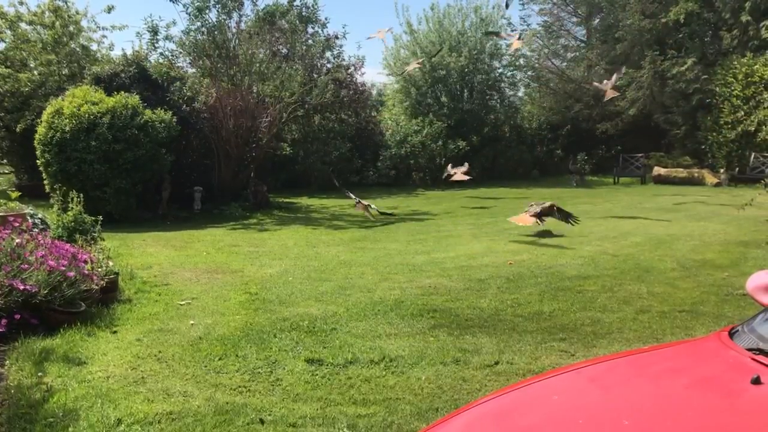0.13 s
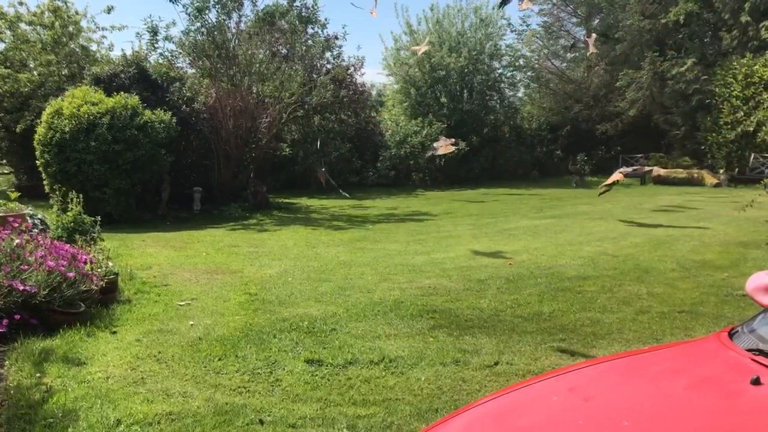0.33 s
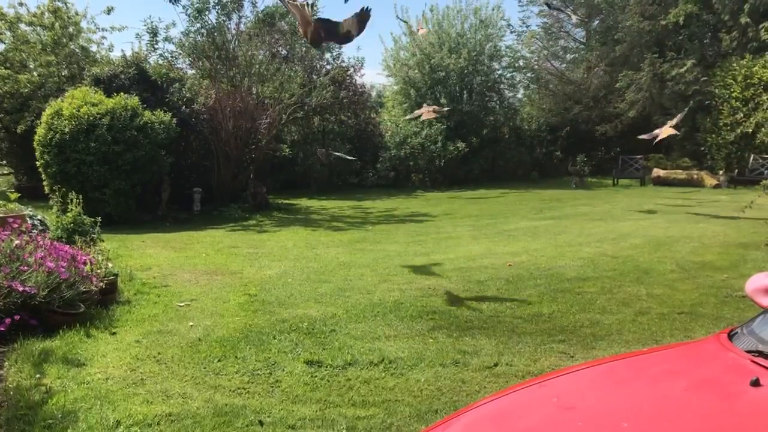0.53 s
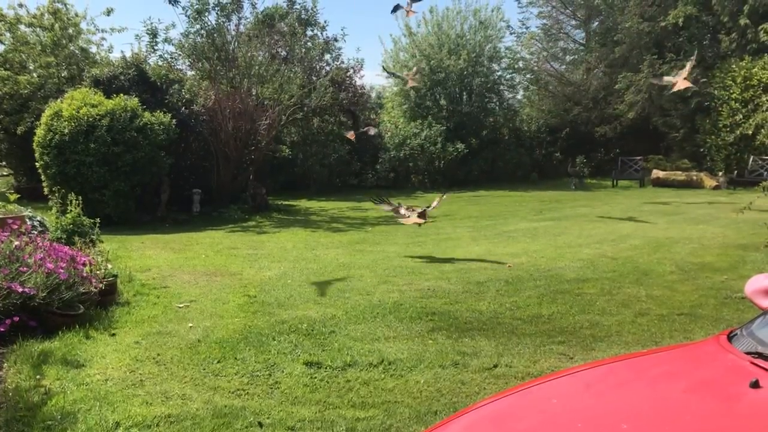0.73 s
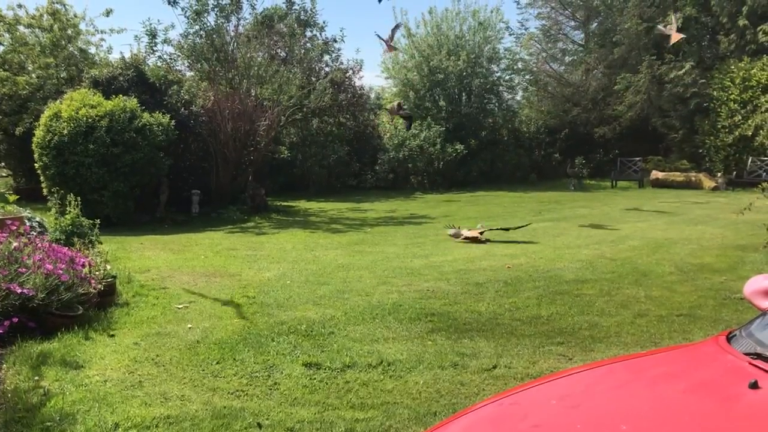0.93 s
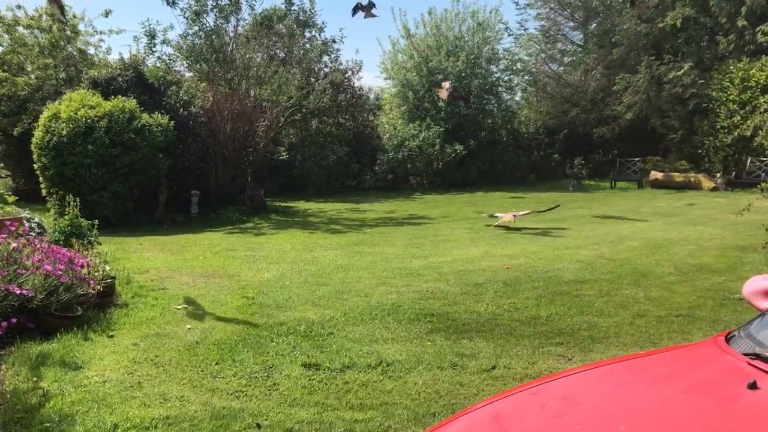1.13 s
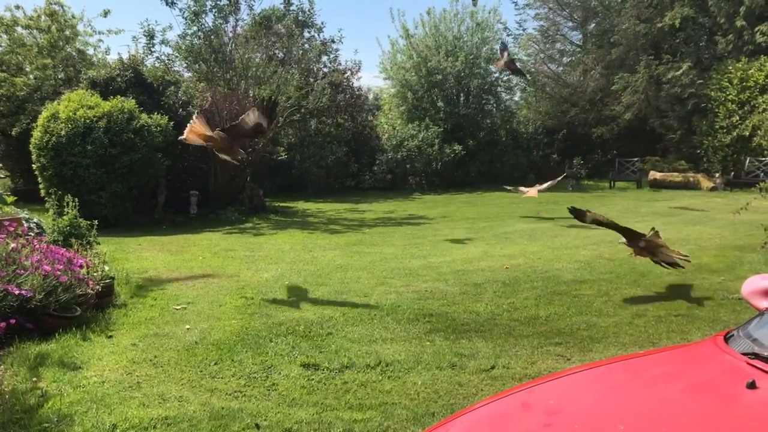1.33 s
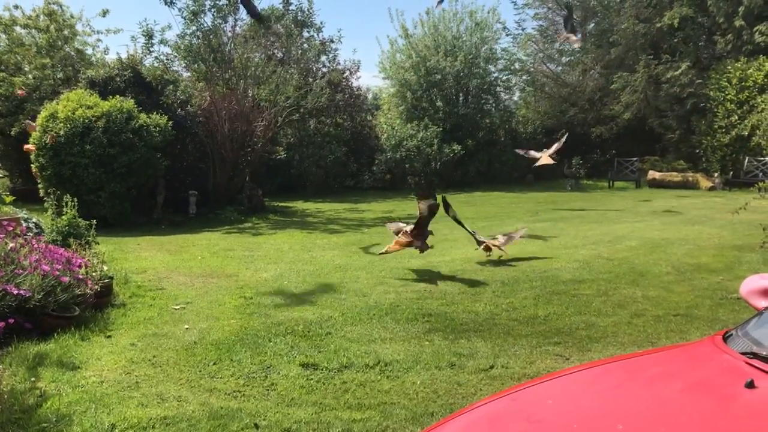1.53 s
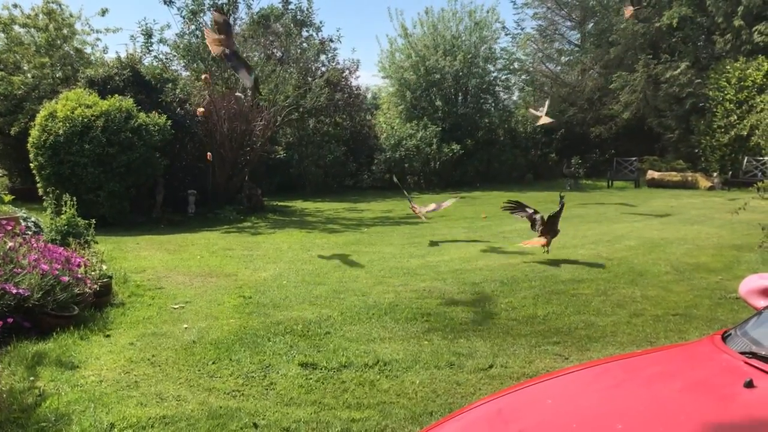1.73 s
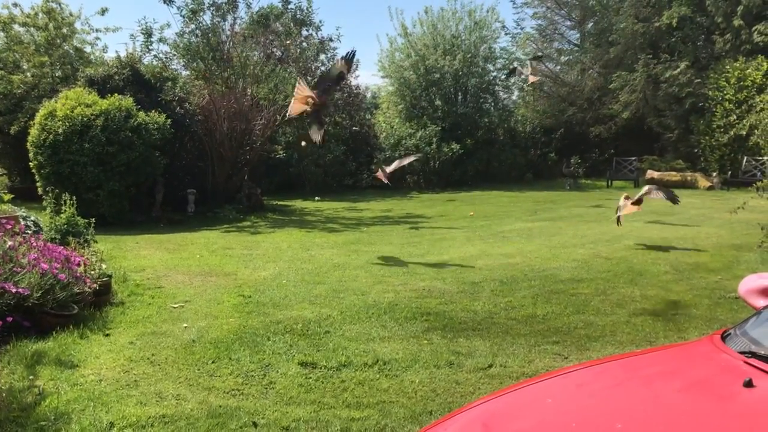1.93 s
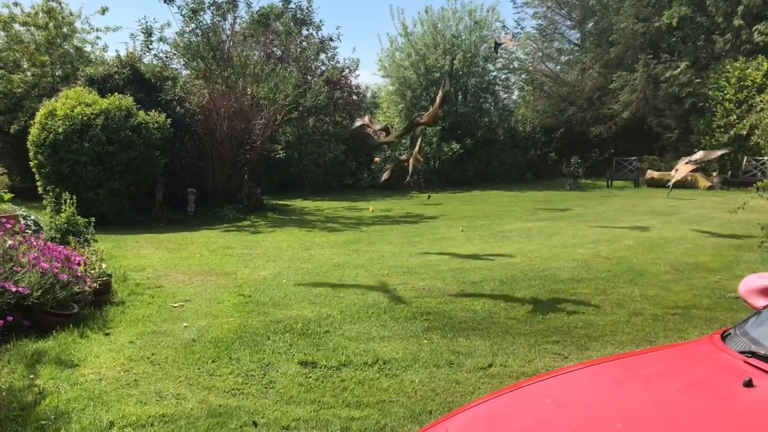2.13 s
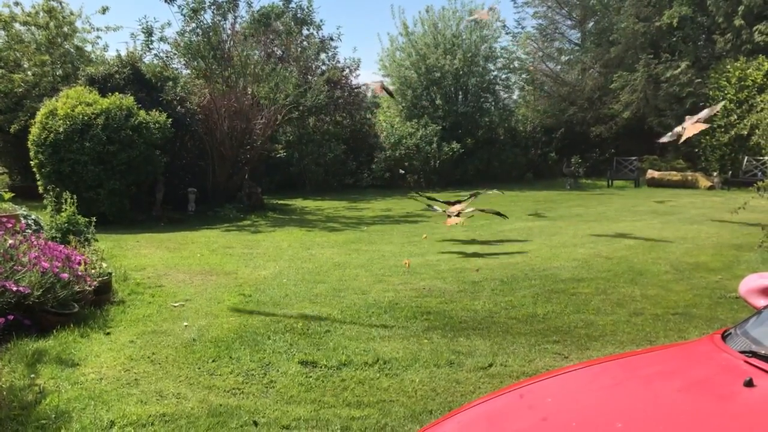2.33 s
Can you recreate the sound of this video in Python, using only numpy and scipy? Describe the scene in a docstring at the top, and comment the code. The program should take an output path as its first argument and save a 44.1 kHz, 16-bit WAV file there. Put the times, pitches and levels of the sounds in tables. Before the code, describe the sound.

Red kites whistle over a quiet garden. From 0.2 s a call rises near 2 kHz, leaps above 3 kHz, wavers hoarsely, cracks higher and drops by 0.78 s; a second kite overlaps at 0.2-0.43 s. Softer mews near 2.2 kHz follow at 0.85, 1.24, 1.38-1.6 (longest), 1.7 and 1.95 s. Faint wingbeats, swishes, a tiny snap at 1.58 s, breeze, low rumble and short tree echoes.

```python
"""A garden lawn with trees around it, under a light breeze and a low outdoor rumble. Wings beat in bursts of
coloured noise, with feather swishes and snaps and low puffs from the nearest wings. One red kite gives a long
whistle that breaks up into a high register and falls back, a second joins it, and five shorter mews follow:
unsteady tones with overtones, hoarsened by a fast phase flutter. The ground answers the calls with a few single
echoes, and the trees with a soft tail."""
import sys
import numpy as np
from scipy import signal
from scipy.fft import rfft, irfft, next_fast_len
from scipy.io import wavfile
from scipy.ndimage import map_coordinates

SR = 44100
rng = np.random.default_rng(int(sys.argv[2]) if len(sys.argv) > 2 else 0)


def file_out(sig):
    """Save sig as 16-bit WAV at sys.argv[1]."""
    # one column per channel
    cols = np.atleast_2d(sig).T
    # limit, then scale
    lim = np.clip(cols, -1, 1)
    pcm = np.round(lim * 32767).astype(np.int16)
    wavfile.write(sys.argv[1], SR, pcm)


N = 105840  # samples, 2.4 s

# Light wind in the leaves: time_s, level_db (before BREEZE_DB is added)
BREEZE_LEVEL = [(0.0, -60.5), (0.29, -63), (0.43, -63.5), (0.57, -64), (0.8, -63.5), (1.1, -64.5),
                (1.31, -60.5), (1.73, -64), (1.94, -59.5), (2.14, -64.5), (2.4, -63.5)]
BREEZE_DB = 3
# Colour of the wind in the leaves: frequency_hz, relative_level_db (per Hz)
LEAF_COLOUR = [(65, 1), (110, -8), (257, -9), (1430, -13.5), (2310, -21), (2560, -17), (3950, -17),
               (4960, -23), (9430, -24.5), (15500, -43)]
# Low outdoor rumble, its colour: frequency_hz, relative_level_db (per Hz)
RUMBLE_COLOUR = [(15, -66), (25, -19), (33, -14), (45, -10.5), (55, 0), (68, -4), (82, -7.5), (100, -7.5),
                 (125, -15), (220, -21), (500, -41)]
# Drift of the rumble: time_s, level_db
RUMBLE_LEVEL = [(0, -62), (.06, -59), (.38, -56), (.7, -61.5), (.85, -60.5), (1.04, -61.5), (1.3, -58.5),
                (1.39, -58.5), (1.43, -64), (1.52, -57.5), (2.0, -60), (2.14, -64), (2.3, -56), (2.4, -62)]

# Faint, narrow hiss behind the mews: centre_s, length_s, level_db
HAZES = [(1.125, 0.027, -67), (1.265, .04, -62), (1.43, .03, -63), (1.53, 0.032, -63)]
# Colour of that hiss: frequency_hz, relative_level_db (per Hz)
HAZE_COLOUR = [(1500, -29), (2500, -12), (3050, 0), (3400, -4), (4200, -17), (6000, -39)]

# Wingbeats: centre_s, length_s, level_db
WINGBEATS = [(.32, 0.034, -60), (.39, 0.02, -55), (.49, 0.069, -57), (.697, .016, -54), (1.165, .01, -60),
             (1.705, 0.018, -57.5), (1.78, 0.051, -61.5), (1.96, 0.09, -57), (2.03, 0.018, -53.5),
             (2.15, 0.025, -55), (2.355, 0.026, -58.5)]
# Colour of a wingbeat: frequency_hz, relative_level_db (per Hz)
WING_COLOUR = [(40, -7), (120, -3), (350, 0), (700, -3.5), (1400, -7.5), (3500, -13.5), (8000, -20.5),
               (16000, -29)]
# Feather swishes and snaps: centre_s, length_s, level_db
SWISHES = [(.64, 0.064, -61), (.99, .03, -66), (1.088, 0.019, -58), (1.162, 0.015, -65),
           (1.5765, .0012, -47.5), (1.582, 0.015, -60), (1.607, 0.0098, -59.5), (1.835, 0.022, -62.5),
           (2.015, 0.047, -61), (2.12, 0.019, -64)]
# Colour of rushing feathers: frequency_hz, relative_level_db (per Hz)
FEATHER_COLOUR = [(300, 0), (1500, -1), (4000, 4.5), (9000, 1.5), (12000, -3), (16000, -4.5)]
# Low puffs of air from the nearest wings: centre_s, length_s, level_db
PUFFS = [(.21, 0.013, -61), (.975, 0.017, -63), (1.8, 0.051, -60.5), (1.985, 0.013, -54.5),
         (2.03, 0.023, -56), (2.14, 0.043, -64.5)]
# Colour of a puff: frequency_hz, relative_level_db (per Hz)
PUFF_COLOUR = [(40, -28), (90, -0.5), (150, 2), (240, -8), (370, -2), (600, -25.5), (2000, -57)]

# Single echoes off the ground: delay_s, level_db
ECHOES = [(.021, -10.5), (.033, -15.5), (.062, -32.5)]
# Diffuse tail from the trees: frequency_hz, decay_s (time to fall 60 dB)
TAIL_DECAY = [(300, 0.54), (2500, 0.53), (5000, 0.46), (12000, 0.28)]
TAIL_DB = -14.5  # energy of the whole tail against the sent call

# Calls, each traced as: time_s, pitch_hz, first_harmonic_db, second_harmonic_db, third_harmonic_db
# (levels before air loss and shimmer). First the long whistle, in five pieces:
LONG_START = [(.187, 1827, -54, -71, -71), (.2, 1983, -52.5, -49.5, -68), (.215, 2045, -57, -53, -74),
              (.23, 2130, -43, -63, -65), (.255, 2165, -57, -67, -63), (.275, 2130, -51, -56, -63),
              (.295, 2045, -49, -54.5, -77), (.325, 2170, -48, -68, -80)]
LONG_HIGH = [(.311, 3150, -47, -76, -84), (.33, 3125, -39.5, -58.5, -80), (.39, 3090, -40, -57.5, -71),
             (.42, 3140, -48, -70, -73), (.446, 3220, -53, -60, -74), (.457, 3255, -37, -61, -69),
             (.5, 3240, -44.5, -58, -67), (.54, 3248, -37.5, -62.5, -67), (.578, 3300, -45, -69, -69),
             (.586, 3340, -52, -72, -68), (.601, 3350, -52, -69, -71), (.608, 3330, -39.5, -63, -60),
             (.626, 3340, -46, -63, -64), (.632, 3290, -34, -58, -64), (.643, 3285, -34, -57, -59),
             (.66, 3335, -45.5, -69, -67), (.668, 3340, -36, -67, -60), (.678, 3335, -45.5, -65, -70),
             (.688, 3290, -37.5, -61, -70), (.699, 3320, -41.5, -62, -70), (.71, 3346, -35, -66, -72),
             (.722, 3350, -41, -72, -78)]
LONG_CRACK = [(.713, 3910, -42, -72, -85), (.724, 3990, -40.5, -61, -73), (.74, 3820, -43.5, -64, -78)]
LONG_DROP = [(.735, 3120, -57, -68, -62), (.749, 3115, -32.5, -51, -63), (.758, 3024, -40.5, -51, -62)]
LONG_END = [(.756, 2260, -55, -68, -72), (.768, 2200, -46.5, -55, -78), (.777, 2070, -56, -61, -80)]
# The second kite, same columns:
SECOND_START = [(.215, 2002, -53.5, -66, -75), (.25, 2170, -45, -59, -70), (.267, 2290, -49.5, -56, -69),
                (.285, 2410, -65, -70, -71), (.302, 2450, -44.5, -61, -66), (.313, 2530, -58, -84, -77)]
SECOND_HIGH = [(.335, 2910, -56, -63, -71), (.351, 2860, -33, -57, -64), (.366, 2875, -34.5, -50.5, -69),
               (.38, 2896, -33, -41, -66), (.397, 2860, -31, -64, -70), (.407, 2808, -40, -54, -68),
               (.412, 2850, -51, -47, -64), (.428, 2830, -66, -63, -76)]
# Five mews, same columns:
MEW_1 = [(.846, 2240, -57, -76, -84), (.857, 2272, -48, -64, -66), (.872, 2278, -48.5, -62, -60),
         (.887, 2295, -45, -54, -62), (.9, 2305, -49.5, -51, -69)]
MEW_2 = [(1.236, 2206, -60, -64, -77), (1.25, 2196, -49.5, -55, -74), (1.275, 2250, -48, -46.5, -57),
         (1.292, 2205, -45.5, -52, -68), (1.307, 2120, -49, -59, -70), (1.322, 2030, -60.5, -61, -71),
         (1.345, 1920, -58, -77, -82)]
MEW_3 = [(1.38, 2060, -76, -61, -84), (1.4, 2160, -59, -62, -71), (1.42, 2215, -46, -60.5, -76),
         (1.445, 2305, -45, -55, -72), (1.467, 2355, -44.5, -66, -74), (1.497, 2290, -43.5, -55, -77),
         (1.52, 2262, -45.5, -52.5, -75), (1.545, 2320, -48, -59, -70), (1.568, 2358, -44.5, -67, -59),
         (1.59, 2315, -53, -53, -61), (1.606, 2200, -51, -62, -79)]
MEW_4 = [(1.694, 2193, -59, -55, -72), (1.704, 2225, -48.5, -48.5, -67), (1.718, 2243, -52.5, -74, -74)]
MEW_5 = [(1.954, 2000, -58, -55, -77), (1.963, 2120, -54.5, -45.5, -58), (1.97, 2197, -61, -52, -68),
         (1.98, 2256, -54, -39.5, -63), (1.99, 2314, -52, -50, -58.5), (2.005, 2292, -48, -53, -65),
         (2.022, 2313, -49, -50, -62), (2.03, 2264, -50, -51, -59)]
# Character of every call: trace, overtone_fall_db (per harmonic above the third),
# rasp_start_rad, rasp_end_rad (phase flutter), echo_send_db
VOICES = [(LONG_START, 8.3, .02, 0.019, 0.81), (LONG_HIGH, 19, 0.072, 0.16, -1.1),
          (LONG_CRACK, 15, 0.055, 0.13, -2.2), (LONG_DROP, 5.7, .11, 0.1, -0.85), (LONG_END, 9, .1, .1, -1),
          (SECOND_START, 11, .05, 0.054, 4.2), (SECOND_HIGH, 3.3, 0.025, 0.032, -6.5),
          (MEW_1, 10.4, 0.018, 0.017, -1), (MEW_2, 10, 0.043, 0.04, 0), (MEW_3, 5.4, .08, 0.051, 0.56),
          (MEW_4, 11, 0.026, 0.028, 0), (MEW_5, 2, 0.031, 0.034, 0)]

RASP_HZ, RASP_WIDTH_HZ = 700, 260  # phase flutter that puts hoarse sidebands beside the whistle
JITTER, JITTER_RATE = 0.0027, 220  # pitch unsteadiness: share of the pitch, knots a second
BREAK_JITTER = 0.016  # extra pitch unsteadiness per radian of rasp
SHIMMER_DB, SHIMMER_GROWS_DB = 1, 0.52  # level flutter of the fundamental; extra for each overtone
EDGE_S = 0.005  # fade at each end of a call
AIR_HZ = 12000  # overtones fade above this
LOW_CUT_HZ, TOP_HZ = 33, 15770  # band of the microphone


def amp(db):
    """Decibels to amplitude."""
    return 10 ** (np.asarray(db) / 20)


def unit(x):
    """Scale to an rms of 1."""
    return x / np.sqrt(np.mean(x ** 2) + 1e-20)


def along(points, hz):
    """Read (Hz, value) points along a log frequency axis."""
    f, value = np.transpose(points)
    return np.interp(np.log(hz + 1), np.log(f + 1), value)


def wobble(rate):
    """A smooth random curve through `rate` knots a second."""
    knots = rng.standard_normal(N // 8)
    return map_coordinates(knots, [np.arange(N) * rate / SR], mode="wrap")


def filtered(x, response):
    """Multiply the spectrum of x by a response of frequency."""
    size = next_fast_len(N + SR // 2)
    hz = np.fft.rfftfreq(size, 1 / SR)
    return irfft(rfft(x, size) * response(hz), size)[:N]


def noise(colour):
    """Coloured noise with an rms of 1."""
    return unit(filtered(rng.standard_normal(N), lambda hz: amp(along(colour, hz))))


def rumble():
    """Low outdoor rumble: bass noise whose level drifts."""
    level_db = np.interp(np.arange(N) / SR, *np.transpose(RUMBLE_LEVEL))
    return amp(level_db) * noise(RUMBLE_COLOUR)


def breeze():
    """Light wind in the leaves: coloured noise that drifts slowly and flickers a little."""
    level_db = np.interp(np.arange(N) / SR, *np.transpose(BREEZE_LEVEL))
    return amp(level_db + BREEZE_DB + 0.69 * wobble(22.1)) * noise(LEAF_COLOUR)


def garden(calls):
    """The ground returns a few single echoes; the trees add a tail that dies at its own pace per band."""
    hz, t, bands = signal.stft(rng.standard_normal(SR // 2), SR, nperseg=256)
    decay = amp(-60 * t / along(TAIL_DECAY, hz)[:, None])
    onset = 1 - np.exp(-t / 0.0087)
    tail = signal.istft(bands * decay * onset, SR, nperseg=256)[1]
    answer = amp(TAIL_DB) * tail / np.linalg.norm(tail)
    for delay_s, level_db in ECHOES:
        answer[round(delay_s * SR)] += amp(level_db)
    return signal.fftconvolve(calls, answer)[:N]


def strokes(rows, colour, rough_db):
    """Bursts of rushing air: noise that swells and fades at each stroke, with a quick ruffle."""
    t = np.arange(N) / SR
    power = sum(amp(db) ** 2 * np.exp(-((t - centre) / length) ** 2) for centre, length, db in rows)
    ruffled = noise(colour) * amp(rough_db * wobble(170))
    return np.sqrt(power) * unit(ruffled)


def haze():
    """Faint, narrow hiss behind the mews, shaped as soft bursts of noise."""
    return strokes(HAZES, HAZE_COLOUR, rough_db=3.5)


def wings():
    """Air driven by the wings: broad beats, brighter feather swishes and low puffs."""
    beats = strokes(WINGBEATS, WING_COLOUR, rough_db=1.5)
    swishes = strokes(SWISHES, FEATHER_COLOUR, rough_db=1.5)
    return beats + swishes + strokes(PUFFS, PUFF_COLOUR, rough_db=3.2)


def rasp_flutter():
    """Irregular flutter around RASP_HZ: noise through a resonance, rms 1."""
    def resonance(hz):
        return (hz < 2 * RASP_HZ) / np.sqrt(1 + ((hz - RASP_HZ) / RASP_WIDTH_HZ * 2) ** 2)
    return unit(filtered(rng.standard_normal(N), resonance))


def whistle(rows, fall_db, rasp_start, rasp_end):
    """One slightly unsteady tone with six harmonics, made hoarse by fluttering its phase."""
    s, *columns = np.transpose(rows)
    t = np.arange(N) / SR
    on = (t > s[0] - EDGE_S / 2) & (t < s[-1] + EDGE_S / 2)
    t = t[on]
    pitch, first, second, third = [np.interp(t, s, column) for column in columns]
    to_edge = np.minimum(t - s[0], s[-1] - t)
    gate = np.sin(np.pi / 2 * np.clip(to_edge / EDGE_S + 0.5, 0, 1)) ** 2

    rasp = np.linspace(rasp_start, rasp_end, len(t))
    flutter = rasp_flutter()[on]
    unsteady = (JITTER + BREAK_JITTER * rasp) * wobble(JITTER_RATE)[on]
    phase = 2 * np.pi * np.cumsum(pitch * (1 + unsteady)) / SR + rasp * flutter

    levels = [first, second] + [third - fall_db * k for k in range(4)]
    out = np.zeros(N)
    for k, level_db in enumerate(levels, 1):
        air = 1 / np.sqrt(1 + (k * pitch / AIR_HZ) ** 12)
        shimmer_db = (SHIMMER_DB + SHIMMER_GROWS_DB * (k - 1)) * wobble(90)[on]
        level = np.sqrt(2) * amp(level_db + shimmer_db)  # levels are rms
        out[on] += level * air * np.sin(k * phase) * gate
    return out


def kite_calls():
    """All the whistles and mews, heard directly and as sent out to the trees."""
    direct, sent = np.zeros(N), np.zeros(N)
    for rows, fall_db, rasp_start, rasp_end, echo_db in VOICES:
        call = whistle(rows, fall_db, rasp_start, rasp_end)
        direct += call
        sent += amp(echo_db) * call
    return direct, sent


def scene():
    """Kite calls with their echoes, wings, hiss, breeze and rumble, in one channel."""
    direct, sent = kite_calls()
    beating = wings()
    hiss = haze()
    return (direct + garden(sent) + beating + hiss + breeze() + rumble())[None]


def record(dry):
    """The microphone sheds the deepest bass and keeps nothing above its band limit."""
    def microphone(hz):
        low_cut = 1 - 1 / (1 + (hz / LOW_CUT_HZ) ** 6)
        return (hz < TOP_HZ) * low_cut
    return filtered(dry[0], microphone)[None]


dry = scene()
out = record(dry)
file_out(out)
```